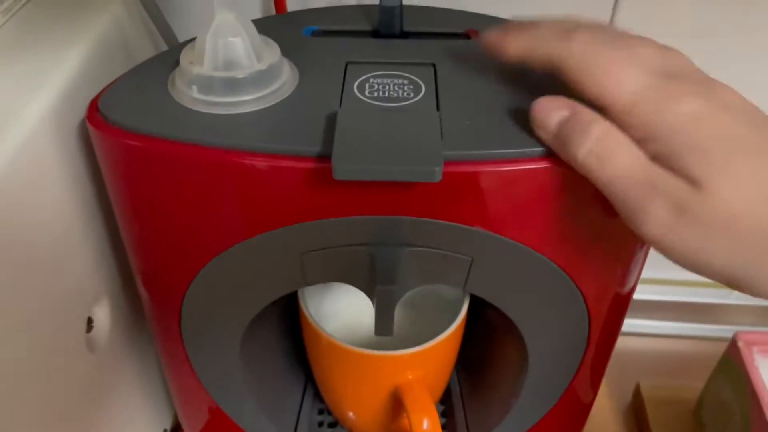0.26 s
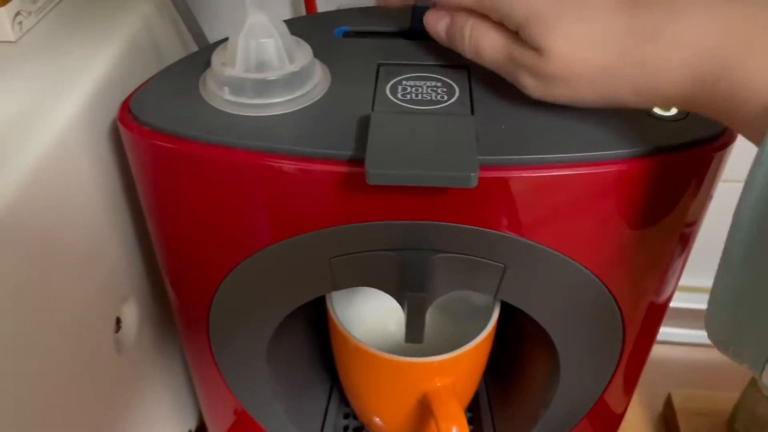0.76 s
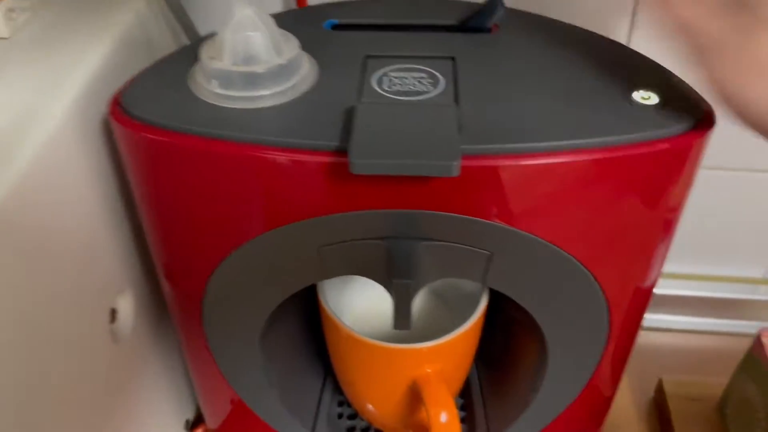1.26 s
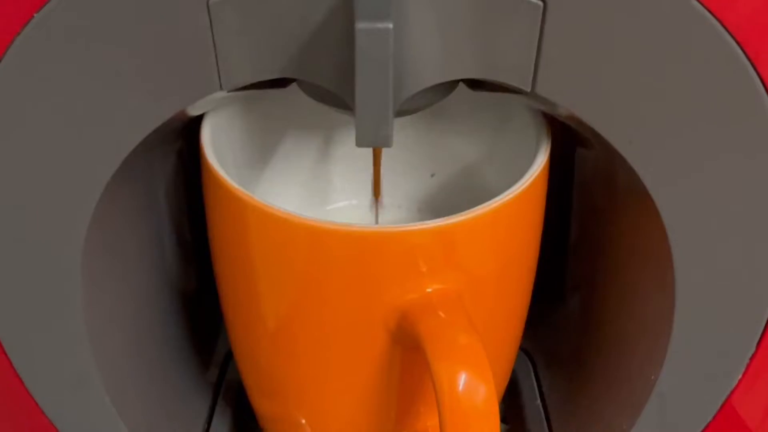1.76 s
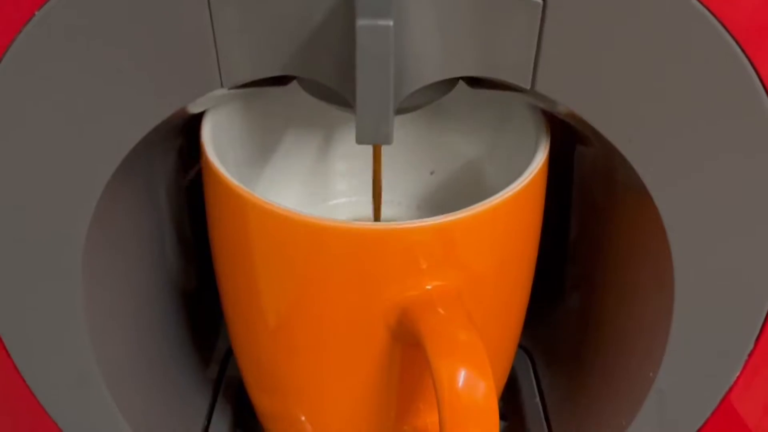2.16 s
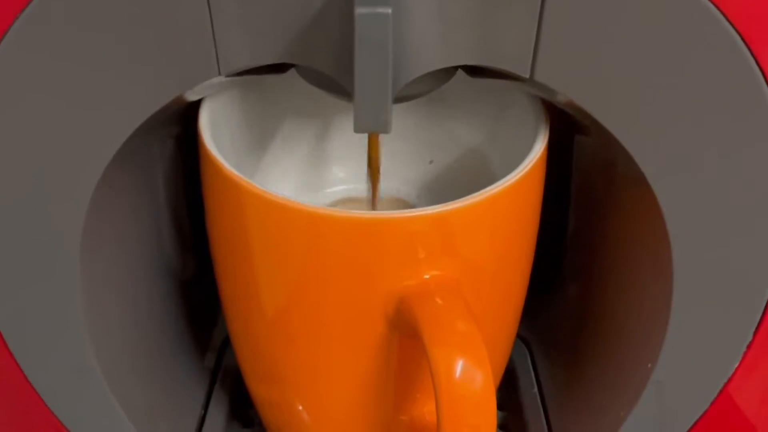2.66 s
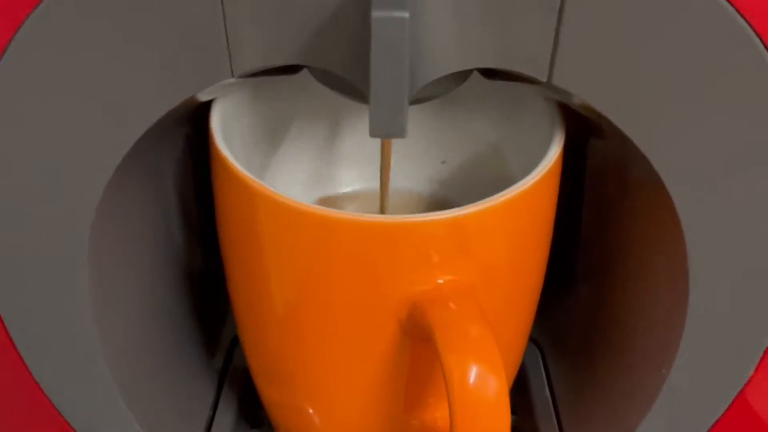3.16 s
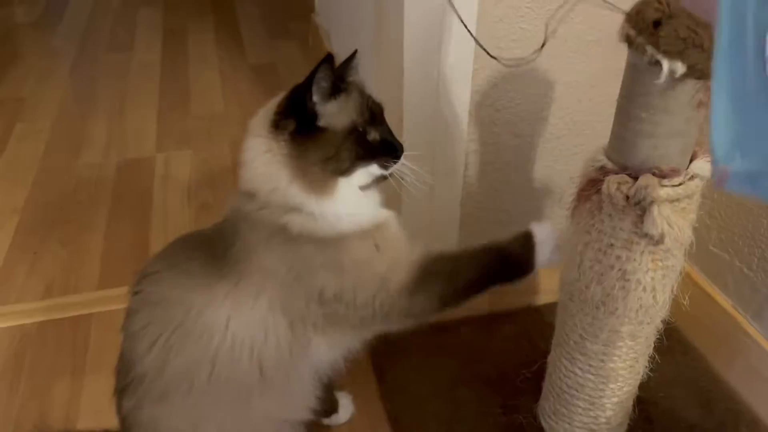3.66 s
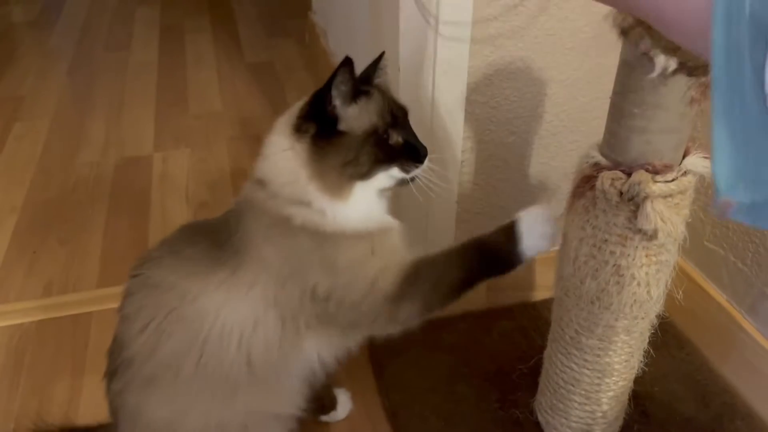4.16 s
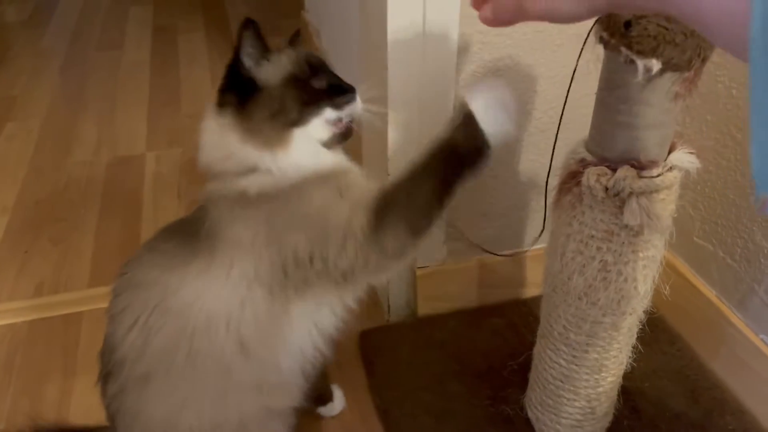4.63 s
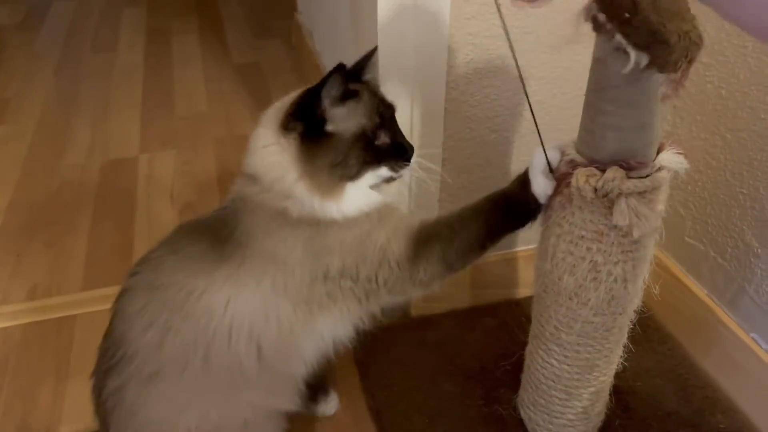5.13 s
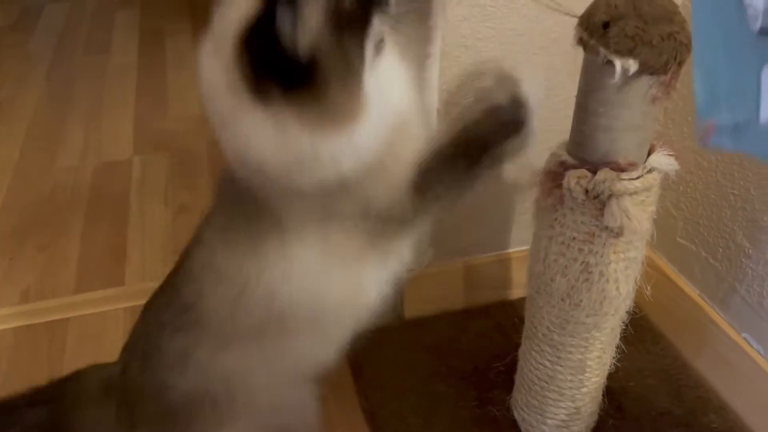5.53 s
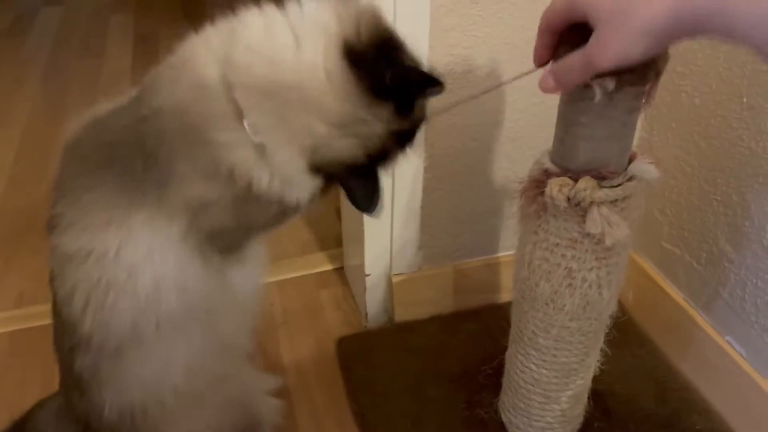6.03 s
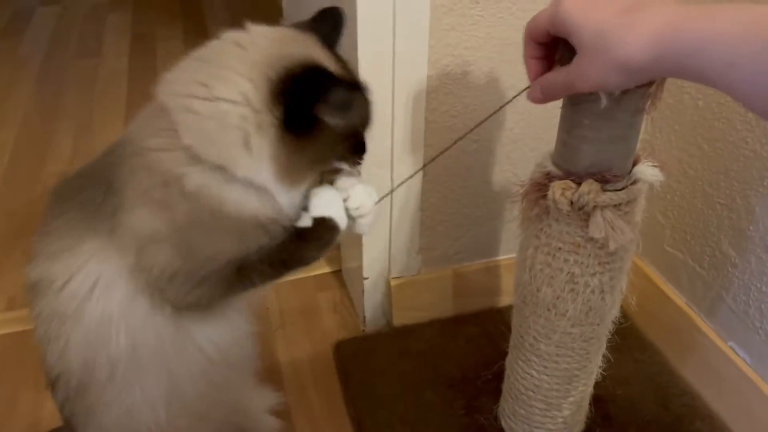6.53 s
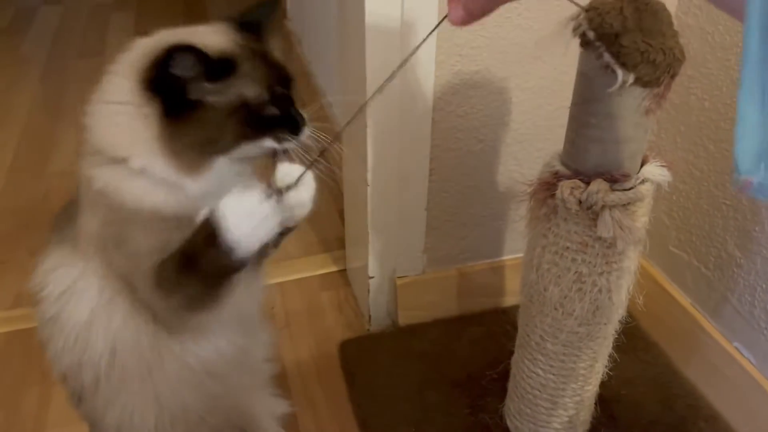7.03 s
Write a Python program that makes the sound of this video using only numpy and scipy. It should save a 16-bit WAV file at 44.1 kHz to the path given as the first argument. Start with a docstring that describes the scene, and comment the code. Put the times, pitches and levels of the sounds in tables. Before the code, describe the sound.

Heard close through a phone, a kitchen coffee machine's lever scrapes and snaps home with a loud hollow clack. Its pump shudders, rattles and then hums evenly, with a few small spits and plops of coffee in a mug. Suddenly it is much quieter: in a hall, a playing cat makes soft rustles, sharp claw ticks on a rope-covered post and light collar bell jingles, followed by one dull bump.

```python
"""A plastic lever rubs, knocks and clacks home as a hand closes a capsule coffee machine. Its mains-driven
piston pump rattles dry, then, after a cut, hums under load while coffee spits and drips into a mug.
A second cut leads to a quiet hall where a cat plays at a scratching post: fur and rope rustle, claws
catch, a pellet jingles in the collar bell. All is heard through the two microphone ports of a phone."""
import sys
import numpy as np
from scipy import signal
from scipy.fft import rfft, irfft, next_fast_len
from scipy.io import wavfile
from scipy.ndimage import uniform_filter1d, map_coordinates

SR = 44100
rng = np.random.default_rng(int(sys.argv[2]) if len(sys.argv) > 2 else 0)


def transcribe(u):
    """Save the signal u as a 16-bit wav file named by the first command-line argument.

    u: samples, shape (n,) or (channels, n), limited to [-1, 1]; the rate is SR.
    q: integer samples, one column per channel.
    """
    v = np.clip(np.atleast_2d(u).T, -1, 1)
    q = np.round(v * 32767).astype(np.int16)
    wavfile.write(sys.argv[1], SR, q)


N = 321489
T = np.arange(N) / SR
MAINS_HZ = 49.9
BREW_CUT_S, HALL_CUT_S = 1.664, 3.633


def amp(db):
    return 10 ** (np.asarray(db) / 20)

def unit(x):
    return x / np.sqrt(np.mean(x ** 2) + 1e-20)

def along(points, hz):
    """Interpolate (Hz, value) points on a log axis."""
    f, v = np.transpose(points)
    return np.interp(np.log(hz + 1), np.log(f + 1), v)

def curves(rows):
    """One value per sample for each column after the time."""
    s, *columns = np.transpose(rows)
    return [np.interp(T, s, column) for column in columns]

def during(start_s, end_s, fade_s):
    """Gate with linear ramps."""
    return np.clip(np.minimum(T - start_s, end_s - T) / fade_s + .5, 0, 1)

def wobble(rate_hz):
    """Smooth random curve through Gaussian knots."""
    return map_coordinates(rng.standard_normal(int(N * rate_hz / SR) + 4), [T * rate_hz])

def filtered(x, response):
    """Apply a complex response, a function of Hz."""
    size = next_fast_len(N + SR // 10, True)
    return irfft(rfft(x, size) * response(np.fft.rfftfreq(size, 1 / SR)), size)[..., :N]

def below(f, corner_hz, order):
    return 1 / (1 + (f / corner_hz) ** order)

def above(f, corner_hz, order):
    return 1 / (1 + (corner_hz / (f + 1)) ** order)

def modes(f, rows):
    """Response of resonances of alternating sign. Each row: centre in Hz, width in Hz, gain in dB."""
    return sum((-1) ** k * amp(db) * 1j * f * width / (hz * hz - f * f + 1j * f * width)
               for k, (hz, width, db) in enumerate(rows))

def tone(spectrum, alike):
    """Stereo noise of rms 1 from (Hz, dB) points and (Hz, left-right correlation) points."""
    def response(f):
        angle = np.arccos(np.clip(along(alike, f), -1, 1)) / 2
        return amp(along(spectrum, f)) * [np.cos(angle), np.sin(angle)]
    mid, side = filtered(rng.standard_normal((2, N)), response)
    return unit(np.array([mid + side, mid - side]))

def noise_bands(spectrum, alike, split_hz):
    """Stereo noise below and above a split, each of rms 1."""
    pair = tone(spectrum, alike)
    low = filtered(pair, lambda f: below(f, split_hz, 4))
    return unit(low), unit(pair - low)

def bursts(events, attack_s, t60_s, rise_share=0, bands=2):
    """One envelope per band. Each event: start in s, dB, relative dB per further band, hold in s if any."""
    out = np.zeros((bands, N + 2 * SR))
    for s, db, *rest in events:
        hold_s = sum(rest[bands - 1:])
        t = np.arange(int(min(hold_s + 2 * t60_s, 2) * SR)) / SR
        onset = 1 - np.exp(-(t / (attack_s + rise_share * hold_s)) ** 2)
        decay = amp(db - 60 * np.maximum(t - hold_s, 0) / t60_s)
        out[:, round(s * SR):][:, :len(t)] += onset * decay * amp([0, *rest[:bands - 1]])[:, None]
    return out[:, :N]

def taps(events):
    """One impulse per event."""
    out = np.zeros(N)
    for s, db, *_ in events:
        out[round(s * SR)] += amp(db)
    return out

def pings(events, t60_s, attack_s, glide_per_s=0):
    """One decaying sine per event."""
    out, t = np.zeros(N + SR), np.arange(SR // 8) / SR
    for s, db, *_, hz in events:
        envelope = amp(db - 60 * t / t60_s) * (1 - np.exp(-t / attack_s))
        out[round(s * SR):][:len(t)] += envelope * np.sin(2 * np.pi * hz * t * (1 + glide_per_s * t))
    return out[:N]

def room(x, t60_s, wet_db):
    """Direct sound plus a decaying, bass-free tail for each port."""
    t = np.arange(SR // 4) / SR
    tail = rng.standard_normal((2, len(t))) * amp(-60 * t / t60_s)
    tail -= uniform_filter1d(tail, size=71, axis=1)
    tail /= np.linalg.norm(tail[0])
    return x + amp(wet_db) * signal.oaconvolve(np.atleast_2d(x), tail, axes=1)[:, :N]

def low_rumble():
    """Deep noise, nearly alike at both ports."""
    # Each row: frequency in Hz, density in dB.
    spectrum = [(15, -32), (50, 3.5), (100, -1.5), (160, -18), (300, -63)]
    return tone(spectrum, [(60, 0.97)])

def handling(rumble):
    """The hand jogs the phone: swells of rumble."""
    # Each row: start in seconds, level in dB, hold in seconds.
    jogs = [(0.0, -53, 0.0091), (0.3, -52, 0.11), (1.083, -40, .08), (5.554, -59.5, 0.29),
            (7.121, -55.5, 0.13)]
    return bursts(jogs, attack_s=0.02034, t60_s=0.29, bands=1)[0] * rumble

def kitchen_air():
    """Room noise that drops early on."""
    # Each row: frequency in Hz, density in dB.
    spectrum = [(40, 5), (100, -5.5), (200, -15.5), (500, -5), (800, -23.5), (1300, -22.5), (2200, -13),
                (3200, -17), (4000, -14), (6000, -21.5), (9500, -19), (10400, -25.5), (11000, -56.5)]
    # Each row: time in seconds, level in dB.
    levels = [(.35, -56.5), (.8, -61)]
    return amp(curves(levels)[0] + wobble(11)) * tone(spectrum, [(60, 1.0), (600, 0.33), (2000, 1.0)])

def hall_air(rumble, drone_hz=145):
    """Murmur, hiss, a wavering drone and rumble; the level dips briefly twice."""
    # Each row: frequency in Hz, density in dB.
    spectrum = [(60, -44), (150, -1), (220, -14.5), (305, -7.5), (360, -12.5), (420, -4.5), (600, -12.5),
                (900, -26.5), (2000, -33.5), (4000, -34.5), (9500, -36), (10800, -81)]
    # Each row: frequency in Hz, left-right correlation.
    alike = [(60, 0.75), (200, 0.7), (380, 0.53), (700, 0.044), (1300, 0.61), (4000, 1)]
    # Each row: time in seconds, level in dB.
    hiss_levels = [(3.65, -73), (3.9, -75.5), (4.25, -75), (4.33, -84), (4.75, -84), (4.9, -72), (5.3, -73),
                   (5.85, -92.5), (6.0, -83), (6.5, -80), (6.9, -69), (7.1, -74.5), (7.29, -76.5)]
    # Each row: start and end in seconds, gain in dB.
    dips = [(6.243, 6.42, -2.5), (7.136, 7.25, -2.5)]
    drone = amp(-58.5 + 2.6 * wobble(21)) * np.sin(2 * np.pi * drone_hz * T + 1.8 * wobble(8))
    murmur, hiss = noise_bands(spectrum, alike, split_hz=1080)
    murmur *= amp(-60 + 0.92 * wobble(8) + 1.46 * wobble(1.325))
    hiss *= amp(curves(hiss_levels)[0] + 1.5 + 0.97 * wobble(17))
    dip_db = sum(db * during(start_s, end_s, 0.064) for start_s, end_s, db in dips)
    return amp(dip_db) * (murmur + hiss + drone + amp(-57.5 + 2.26 * wobble(5)) * rumble)

def cat_motion():
    """How much the cat moves; drives the fur's rustle and the bell's pellet."""
    # Each row: time in seconds, level in dB.
    levels = [(4.2, -76), (4.68, -76.5), (4.85, -61.5), (5.25, -69.5), (5.49, -65), (6.0, -61.5),
              (6.29, -63), (6.5, -76.5), (6.8, -82.5), (7.1, -78)]
    return amp(curves(levels)[0])

def rustle(motion):
    """Fur, string and rope rub in swipes over a bed that follows the cat's motion."""
    # Each row: frequency in Hz, density in dB.
    spectrum = [(250, -6), (700, -4.5), (1200, -6.5), (2000, -11.5), (2800, -16), (3500, -8), (5000, -2.5),
                (7000, -7), (9300, -1.5), (10200, -6), (10900, -43), (12000, -80)]
    # Each row: start in seconds, treble level in dB, relative low and middle in dB, hold in seconds.
    swipes = [(3.715, -63, -11, -3, 0.076), (4.02, -72, 8.5, -16, 0.036), (4.14, -66, -1, -6, 0.084),
              (4.485, -74.5, -8, -8, 0.026), (4.58, -70, 2, -18, 0.037), (4.745, -65, -28, -22, 0.069),
              (5.11, -67.5, 1.5, -9, 0.039), (5.23, -62.5, -15, -11, 0.038), (5.395, -51.5, 2, 4, 0.0076),
              (5.43, -64, -15, -5, 0.075), (5.565, -60, -5, -9, 0.016), (5.74, -60.5, -32, -9, 0.013),
              (5.805, -71, -36, -20, 0.012), (6.03, -55.5, -10, -15, 0.019), (6.145, -68, -22, -18, 0.016),
              (6.328, -75, 0, -3, 0.028), (6.53, -85, -10, -13, .01), (6.76, -61, -5, -9, 0.084),
              (6.812, -62, -1, -17, 0.027), (7.135, -57.5, -7, -1, 0.079)]
    body, treble = noise_bands(spectrum, [(700, 0.15), (2000, 0.98)], split_hz=3920)
    low = filtered(body, lambda f: below(f, 2000, 6))
    bed = motion * amp([[-9], [-19], [-13.5]])
    treble_env, low_env, mid_env = bed + bursts(swipes, 0.0019, t60_s=0.29, rise_share=0.27, bands=3)
    grain = amp(1.3 * wobble(40) + 1.5 * wobble(500))
    return grain * (treble_env * treble + low_env * unit(low) + mid_env * unit(body - low))

def claws():
    """Claws catch the rope and ring the wooden post."""
    # Each row: start in seconds, level in dB, relative treble in dB, strongest ring in Hz.
    catches = [(3.7418, -51, -6, 1250), (4.144, -49.5, -2, 2050), (4.488, -60.5, 1, 3075),
               (4.807, -52.5, -15, 2400), (4.8967, -56, -1, 2410), (4.925, -50.5, -15, 1116),
               (5.03, -61, 4, 2110), (5.141, -53.5, -2, 1700), (5.3649, -36.5, -12, 1770),
               (5.3954, -22.5, -8, 2550), (5.4132, -34, -6, 2510), (5.4747, -49, 0, 2100),
               (5.748, -50, -10, 1585), (6.04, -51, -11, 1160), (6.534, -67, 7, 4070),
               (6.6453, -56, -17, 1984), (6.689, -66, 0, 4220), (6.816, -45.5, -8, 2410),
               (6.826, -40.5, -8.5, 1170)]
    # Each row: frequency in Hz, density in dB.
    spectrum = [(300, 3), (700, -7), (1200, -2.5), (2500, 1), (3300, -4.5), (4000, 2.5), (5500, -10),
                (7000, 0.5), (9500, -6), (11000, -16.5), (12500, -38), (14000, -36)]
    # Each row: centre in Hz, width in Hz, gain in dB.
    post_modes = [(746, 161, -9), (1264, 150, 2), (1744, 67, -3), (2080, 82, -3.5), (2560, 220, -8.5),
                  (3100, 98, -10), (3800, 230, -1)]
    wood, rope = noise_bands(spectrum, [(700, 0.98), (2000, 1.0)], split_hz=5100)
    wood_env, rope_env = bursts([row[:-1] for row in catches], attack_s=0.0003, t60_s=0.041)
    knock = filtered(wood * wood_env, lambda f: .5 + 1.08 * modes(f, post_modes))
    ring = .6 * pings(catches, t60_s=0.042, attack_s=0.00083)
    return room(amp(-2) * (knock + ring + rope * rope_env), t60_s=0.33, wet_db=-6.5)

def soft_bump(at_s=7.271, level_db=-27.5, hz=265, width_s=0.0065):
    """A hollow bump whose pitch sags."""
    t = T - at_s
    phase = 2 * np.pi * hz * t * (1 - 4 * t)
    return amp(level_db) * np.exp(-(t / width_s) ** 2) * (np.cos(phase) + 0.13 * np.cos(2 * phase))

def collar_bell(motion, dry_pellet_db=-29.5):
    """Strikes ring the shell; the pellet chatters and rolls inside, keeping the modes ringing unevenly."""
    # Each row: start in seconds, level in dB, relative drive of the high modes in dB.
    strikes = [(4.2392, -53, -3), (4.2939, -54, -17), (4.4872, -57, 0.5), (4.6264, -46, -45),
               (4.687, -51, -14), (4.7289, -50, -13), (4.7528, -38, -12.5), (4.7967, -43.5, -8.5),
               (4.898, -41.5, -18), (5.1285, -51, -4), (5.2811, -49, -3), (5.323, -35, -20),
               (5.3957, -33, -15), (5.4308, -42, -17), (5.4504, -32.5, -29), (5.4737, -34, -5),
               (5.513, -35, -6.5), (5.559, -29, -23), (5.5775, -30, -9.5), (5.6204, -44, -22),
               (5.7114, -42, -26), (5.7321, -31, -35), (5.7476, -31.5, -15.5), (5.8098, -30, -20),
               (5.819, -34.5, -23), (5.827, -34.5, -25), (5.834, -33, -25), (5.871, -42, -29),
               (5.934, -47, -15), (6.0405, -36.5, -17), (6.0735, -36.5, -15.5), (6.112, -45, -21),
               (6.1515, -36, -23), (6.2624, -54, -8), (6.3351, -38.5, -13.5), (6.3981, -45, -5),
               (6.7806, -54, -10)]
    # Each row of both: centre in Hz, width in Hz, gain in dB.
    low_modes = [(3760, 80, -15), (3890, 55, -7), (3985, 34, 2), (4045, 36, 2), (4140, 75, -5),
                 (4330, 110, -11), (4700, 150, -16), (5545, 150, -19)]
    high_modes = [(9760, 30, 0), (9850, 60, -9), (10380, 60, -9)]
    def shell(f):
        pellet = amp(dry_pellet_db) * above(f, 4400, 8)
        return (modes(f, low_modes) + pellet) * below(f, 7000, 8) * above(f, 3700, 24)
    roll = motion * amp(2 * wobble(60)) * during(4.2, 7.1, 0.11) * amp([[6], [-14]])
    chatter = rng.standard_normal(N) * amp(3.6 * wobble(250))
    low_drive, high_drive = (bursts(strikes, attack_s=0.00092, t60_s=0.034) + roll) * chatter
    low_ring = filtered(amp(14.5) * low_drive + amp(33) * taps(strikes), shell)
    high_ring = filtered(high_drive, lambda f: modes(f, high_modes) * below(f - 10000, 600, 6))
    return room(low_ring + amp(32.5) * high_ring, t60_s=0.19, wet_db=-5.5)

def coffee():
    """The nozzle spits; drops in the mug ring as bubbles of rising pitch."""
    # Each row: start in seconds, level in dB, relative low band in dB.
    spits = [(2.3978, -32, -25), (2.4713, -25.5, 0), (2.6358, -25, -17), (2.7287, -35.5, -21),
             (2.7646, -36, -32)]
    # Each row: start in seconds, level in dB, pitch in Hz.
    drops = [(2.472, -34, 2290), (2.636, -37, 3040), (2.662, -19, 1043), (2.765, -39, 2050),
             (3.075, -23, 1160), (3.196, -28, 1130)]
    spectrum = [(1500, -34), (2500, -8), (3500, -3), (6500, 4), (9500, 1), (11500, -19), (13500, -60)]
    low, high = noise_bands(spectrum, [(3000, 0.98)], split_hz=2500)
    high_env, low_env = bursts(spits, attack_s=0.0012, t60_s=0.033)
    bubbles = pings(drops, t60_s=0.033, attack_s=0.0013, glide_per_s=2.3)
    return amp(-4) * (high * high_env + low * low_env) + bubbles

def machine_jump(at_s=1.3, level_db=-25.5, hz=104, width_s=0.0236):
    """The machine jumps once on the counter."""
    t = T - at_s
    return -amp(level_db) * np.exp(-(t / width_s) ** 2) * np.cos(2 * np.pi * hz * t)

def lever_and_housing(boom_width_hz=110):
    """Lever knocks, rubbing and the pump's first shudder shake one hollow housing; its boom shifts."""
    # Each row: frequency in Hz, density in dB.
    spectrum = [(40, -15), (100, -11.5), (300, 4), (550, -1.5), (900, -5.5), (1600, -9), (2400, -8),
                (2900, -15.5), (5000, -18), (8000, -18), (9700, -24.5), (11000, -29.5), (12500, -47),
                (15500, -51.5)]
    # Each row: centre in Hz, width in Hz, gain in dB.
    housing_modes = [(328, 110, -3), (423, 140, 0.5), (746, 65, -12), (824, 55, -1), (990, 97, -13.5),
                     (1287, 68.5, 0), (1626, 37, -9), (2420, 43, -7.5), (2540, 50, -13.5)]
    # Each row: start in seconds, level in dB, relative treble and boom in dB, panel ring in Hz.
    knocks = [(.284, -42, -5, -20, 1500), (.293, -31, -3, -11, 1547), (0.306, -41, -8, 3, 1080),
              (.64, -39, -15, -23, 955), (.648, -41, -9, -29, 1190), (.657, -40.5, -11, -24, 1400),
              (0.665, -43, -27, -24, 1310), (.69, -43, -30, -10, 990), (.718, -41, -38, -3, 650),
              (0.743, -45, -39, -8, 953), (.843, -48, -12.5, -9.5, 790), (0.876, -44.5, -3.5, -15.5, 1350),
              (.895, -38.5, -7.5, -21.5, 700), (.914, -49, -15.5, -8, 1340), (0.955, -32.5, -26.5, -9, 930),
              (.969, -31.5, -8, -12, 925), (.983, -31.5, -23.5, -13, 781), (1.012, -27.5, -20, -13.5, 1440),
              (1.024, -35, -19.5, -1, 719), (1.049, -24.5, -18, -3, 714), (1.063, -29.5, -2, -9.5, 1280),
              (1.077, -23, -4, -10.5, 740), (1.0875, -11.5, -8, -4, 823), (1.0915, -9.5, -14, -1.5, 759.4),
              (1.175, -22.5, -13, -16, 697)]
    # Each row of both: time in seconds, body level in dB, boom level in dB, boom pitch in Hz.
    rub = [(.6, -78, -69, 331), (.645, -61, -73, 328.7), (.69, -64, -53.5, 352.4),
           (.725, -54, -45.5, 354.6), (.765, -65, -58, 379), (.785, -66.5, -57, 368.7),
           (.87, -67, -53.5, 399.8), (.935, -67, -60.5, 350), (.96, -45.5, -45, 341.4),
           (1.03, -43, -44.5, 289.6), (1.07, -42.5, -40, 281), (1.092, -23.5, -21.5, 308),
           (1.114, -37.5, -35.5, 297.2), (1.16, -47, -45, 307)]
    shudder = [(1.168, -33, -40.5, 347.6), (1.18, -29, -32.5, 388.5), (1.212, -34.5, -23, 403),
               (1.245, -24.5, -25.5, 346), (1.275, -31, -34, 320.5), (1.31, -36, -32.5, 272),
               (1.35, -40.5, -36.5, 258.6), (1.45, -46, -48, 262)]
    alike = [(300, 0.99), (700, 0.6), (1200, 1.0), (5000, 0.88)]
    low, treble = noise_bands(spectrum, alike, split_hz=2600)
    boom = unit(filtered(low, lambda f: below(f, 520, 6)))
    body = unit(filtered(low, lambda f: (0.32 + modes(f, housing_modes)) * above(f, 520, 6)))
    body_env, _, boom_env = bursts([row[:4] for row in knocks], attack_s=0.00097, t60_s=0.049, bands=3)
    _, treble_env = bursts([row[:3] for row in knocks], attack_s=0.00052, t60_s=0.029)
    out = amp(-9) * body_env * body + amp(-4.5) * boom_env * boom + amp(2.5) * treble_env * treble
    out += amp(9) * filtered(taps(knocks), lambda f: modes(f, housing_modes))
    out += amp(-5.5) * pings(knocks, t60_s=0.059, attack_s=.002)
    stick_slip = unit(amp(1.4 * wobble(90) + 1.8 * wobble(400)))
    sway = filtered(rng.standard_normal((2, N)), lambda f: below(f, boom_width_hz / 2, 4))
    for rows, treble_db in (rub, -23.5), (shudder, -5):
        body_db, boom_db, boom_hz = curves(rows)
        phase = 2 * np.pi * np.cumsum(boom_hz) / SR
        ring = unit(sway[0] * np.cos(phase) + sway[1] * np.sin(phase))
        scrape = stick_slip * amp(body_db) * (body + amp(treble_db) * treble)
        hollow = amp(boom_db) * (.75 * ring + 0.52 * boom)
        out += during(rows[0][0], rows[-1][0], 0.0085) * (scrape + hollow)
    return room(out, t60_s=0.31, wet_db=-10.5)

def valve(spectrum, turn, body_db, hiss_db, throb_db, rings_below_hz=9000):
    """The valve ticks and hisses hardest at each piston jolt; turn is the cycle position, 0 to 1."""
    # Each row: centre in Hz, width in Hz, gain in dB.
    valve_modes = [(1823, 100, -27), (3740, 41, 4), (4300, 340, -10.5), (5005, 410, 7.5), (5860, 120, -5.5),
                   (6180, 150, 4.5), (6970, 81, -8)]
    body, hiss = noise_bands(spectrum, [(100, 1.0), (600, 0.4), (1200, 1.0)], split_hz=3900)
    period = round(SR / MAINS_HZ)
    rattle = rng.standard_normal(period)[(turn * period).astype(int)]  # repeats every cycle
    ticks = unit(filtered(rattle, lambda f: above(f, 2200, 8) * below(f, 6000, 8)))
    level = amp(hiss_db + 0.59 * wobble(7.8))
    noise = amp(body_db) * body + level * (amp(1.9 * wobble(360)) * hiss + amp(-6) * ticks)
    throb = amp(throb_db * np.cos(2 * np.pi * (turn - .05)))
    ringing = filtered(throb * noise, lambda f: (0.79 + 1.19 * modes(f, valve_modes)) * (f < rings_below_hz))
    steady = filtered(noise, lambda f: 1.1 * (f >= rings_below_hz))
    return ringing + steady

def piston(harmonics, turn, lag_cycles=.12, spread_rad=.038, drag_rad=0.4486):
    """Each stroke rings a minimum-phase body; the heavy low swing lags, dragged out in time."""
    db, pan_db = np.transpose(harmonics)
    k = np.arange(len(db)) + 2
    cepstrum = irfft(np.interp(np.arange(65), k, db) * np.log(10) / 20)
    causal = np.r_[1, 2 * np.ones(63), 1, np.zeros(63)]
    phase = rfft(cepstrum * causal).imag[k] + spread_rad * k ** 2
    phase -= (2 * np.pi * k * lag_cycles + drag_rad * k ** 2) * (k < 9)
    width = np.minimum((k - 2) / 8, 1)  # the lowest harmonics reach both ports alike
    shared, apart = rng.standard_normal((2, len(k))) * width
    phase = phase + .45 * shared + .22 * apart * [[1], [-1]]  # scatter off the kitchen walls
    left = 2 / (1 + amp(-pan_db * width))
    phasors = amp(db) * [left, 2 - left] * np.exp(1j * phase)
    cycle = np.arange(4096) / 4096
    waves = np.sqrt(2) * (phasors @ np.exp(2j * np.pi * k[:, None] * cycle)).real
    return np.array([np.interp(turn, cycle, wave, period=1) for wave in waves])

def deep_hum(turn, level_db, waver_hz=2.7, quickening_hz_per_s=.29, crest_s=2.12):
    """The mains fundamental, wavering ever faster by 1 dB."""
    t = T - crest_s
    waver_db = np.cos(2 * np.pi * t * (waver_hz + quickening_hz_per_s * t))
    return amp(level_db + waver_db) * np.sqrt(2) * np.cos(2 * np.pi * (turn - .39))

def pump():
    """The piston jolts the housing once per mains cycle: dry while priming, then under load."""
    # Each row of both, one per mains harmonic from the second up: level in dB, left over right in dB.
    priming = [(-6, 0.2), (-23, -1), (-7.5, 0), (-11.5, -0.5), (-13, -1.5), (-11, -1.5), (-22.5, 0.3),
               (-17.5, -17), (-17, 4), (-38.5, 7), (-19, -14.5), (-10.5, -17), (-14, 10), (-27.5, 6.5),
               (-24, -5), (-13, 6.5), (-20.5, 6.6), (-33, 4), (-34, 0.5), (-16.5, 6), (-21.5, 1.6),
               (-23, 4.2), (-26, -1), (-24.5, 0), (-11.5, -1.5), (-10, -1.5), (-30, 0.5), (-24, -2.9),
               (-29, -1), (-21, 0.0), (-16, -3), (-25, -0.2), (-24.9, -3), (-20, 9), (-30, -1), (-21, 0),
               (-24, 0.5), (-20, -1), (-26, 0)]
    loaded = [(-9.5, -21), (-14.5, 8), (-10, 3.5), (-20.5, -4), (-11, -3.5), (-12.5, 5), (-10.5, 0),
              (-28.5, 2), (-32.5, 5), (-19, -4), (-18.5, 6), (-13, -0.5), (-25.5, -1), (-18, 3),
              (-19.5, -4), (-12, -3.5), (-17.5, 10), (-25.5, 6), (-14.5, -1), (-17, -4), (-13, 1.5),
              (-19.5, 13), (-18, -6), (-31, 2), (-13, -0.5), (-20.5, -16), (-20.5, -1), (-31.5, -14),
              (-22.5, 3), (-46, -3.6), (-41, 9), (-42, -2.3), (-29.5, -10), (-27, -3), (-35, 9), (-23, -2),
              (-35.5, 1)]
    # Each row of both: frequency in Hz, density in dB.
    dry_valve = [(60, 0), (200, -14.5), (500, -17.5), (1000, -12.5), (2000, -15.5), (3000, -29.5),
                 (5000, -34.5), (7000, -30.5), (9500, -24.5), (10500, -29), (12000, -39.5), (13000, -49.5),
                 (14000, -41), (15500, -57.5)]
    wet_valve = [(40, -30), (150, 12), (480, 10.5), (1550, 8.5), (2300, 7), (3000, -4), (6500, -4.5),
                 (8800, 9.5), (10000, 2), (11200, -11), (12000, -33), (13800, -51), (14500, -17),
                 (15500, -32)]
    # Priming list, then loaded list. Each row: time in seconds, buzz, valve hiss and hum levels in dB.
    levels = [
        [(1.17, -46, -47, -46), (1.2, -29.5, -43, -42.5), (1.3, -33, -44.5, -39), (1.35, -34.5, -40, -29.5),
         (1.45, -34, -41.5, -27), (1.66, -33, -41.5, -32)],
        [(1.67, -34, -48.5, -30), (2.6, -34, -49, -30), (3.63, -33, -49, -30)],
    ]
    stages = [(levels[0], priming, dry_valve, 1.172, BREW_CUT_S, -42, 5.5),
              (levels[1], loaded, wet_valve, BREW_CUT_S, HALL_CUT_S, -51, 3.5)]
    out = np.zeros((2, N))
    for rows, harmonics, spectrum, start_s, end_s, body_db, throb_db in stages:
        buzz_db, hiss_db, hum_db = curves(rows)
        turn = (T - (start_s + .014)) * MAINS_HZ % 1
        strokes = piston(harmonics, turn)
        noise = valve(spectrum, turn, body_db, hiss_db, throb_db)
        buzz = amp(buzz_db + 0.25 * wobble(6) + 0.39 * wobble(30)) * strokes
        out += during(start_s, end_s, 0.0018) * (buzz + deep_hum(turn, hum_db) + noise)
    return out

def scene():
    """The kitchen, then a cut to the hall."""
    rumble, motion = low_rumble(), cat_motion()
    kitchen = kitchen_air() + pump() + lever_and_housing() + machine_jump() + coffee()
    hall = hall_air(rumble) + collar_bell(motion) + rustle(motion) + claws() + soft_bump()
    return kitchen * during(-1, HALL_CUT_S, 0.0038) + hall * during(HALL_CUT_S, 9, .004) + handling(rumble)

def record(dry, ceiling=.62, bottom_hz=36, top_hz=15740):
    """The loudest clack is softly rounded off; the band is limited; the ports differ in phase and level."""
    # Each row: frequency in Hz, lead of the left port in radians.
    lead = [(300, -0.1), (1500, 0.0), (2500, 0.5), (4200, 1.0), (4900, 3.4), (5600, 6.1), (6300, 6.5),
            (8400, 9.2), (9600, 9.7), (10700, 10.8), (11800, 12.5), (13800, 12.7), (14600, 14.8),
            (15600, 15.7)]
    # Each row: frequency in Hz, left over right in dB.
    balance = [(90, 0), (250, -1.2), (1000, -.4), (2500, 0)]
    half = np.array([[.5], [-.5]])
    def response(f):
        ports = np.exp(1j * along(lead, f) * half) * amp(along(balance, f) * half)
        return ports * above(f, bottom_hz, 4) * (f < top_hz)
    rounded = dry / (1 + np.abs(dry / ceiling) ** 4) ** .25
    return filtered(rounded, response)


dry = scene()
out = record(dry)
transcribe(out)
```